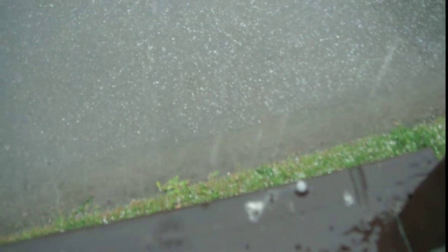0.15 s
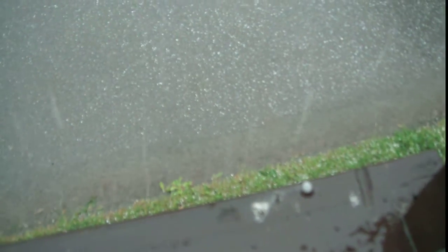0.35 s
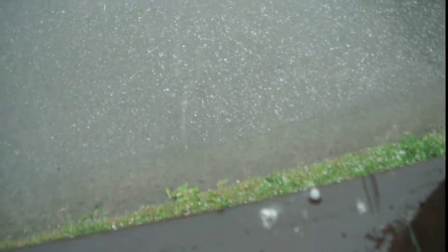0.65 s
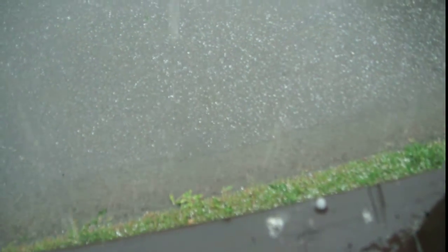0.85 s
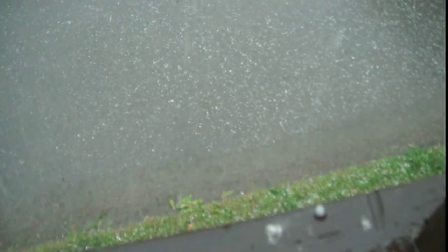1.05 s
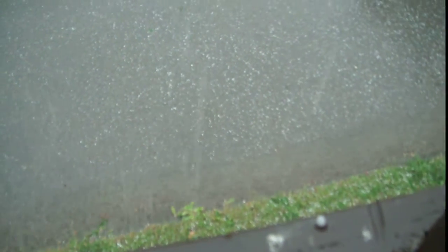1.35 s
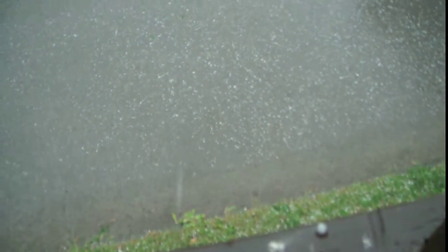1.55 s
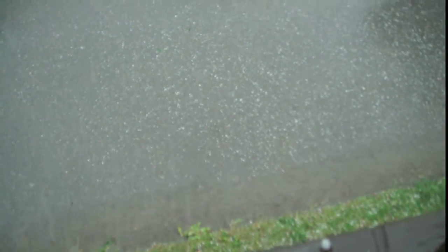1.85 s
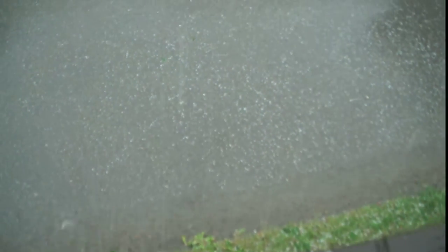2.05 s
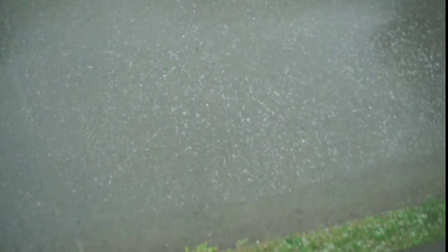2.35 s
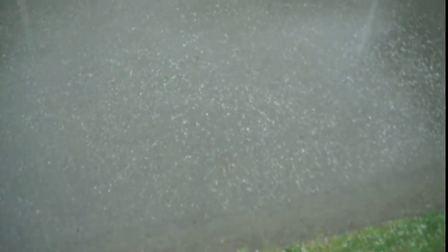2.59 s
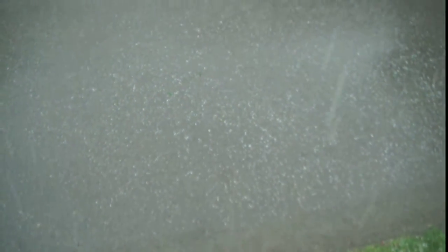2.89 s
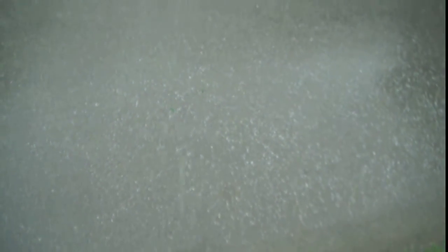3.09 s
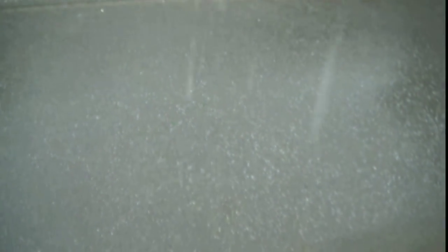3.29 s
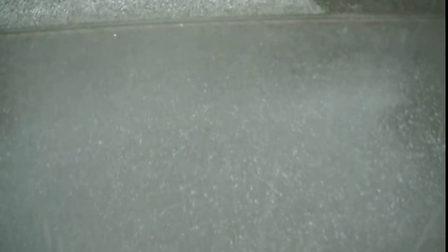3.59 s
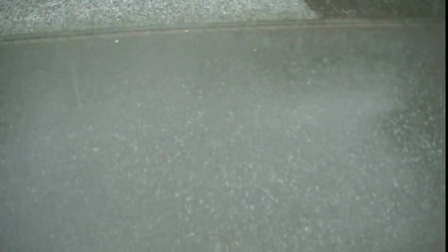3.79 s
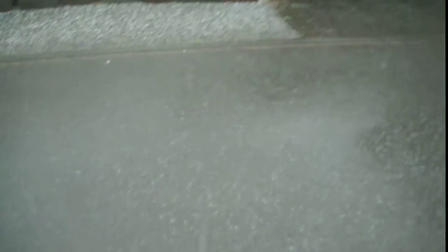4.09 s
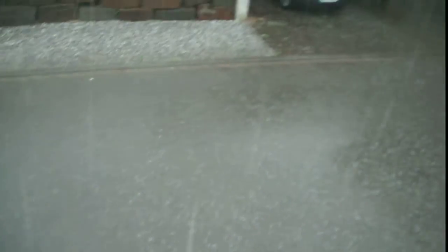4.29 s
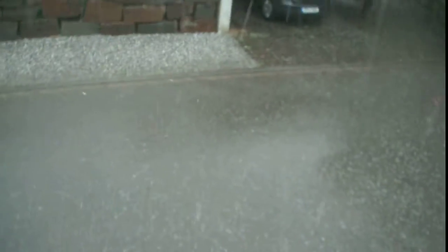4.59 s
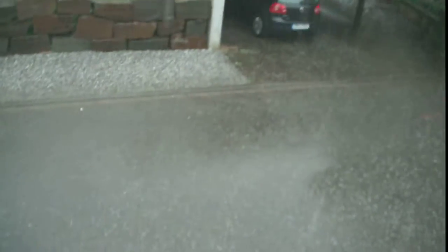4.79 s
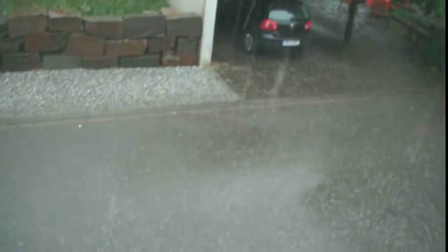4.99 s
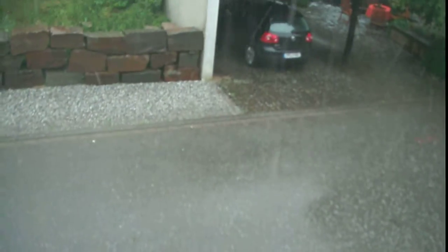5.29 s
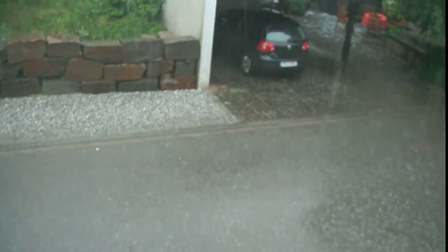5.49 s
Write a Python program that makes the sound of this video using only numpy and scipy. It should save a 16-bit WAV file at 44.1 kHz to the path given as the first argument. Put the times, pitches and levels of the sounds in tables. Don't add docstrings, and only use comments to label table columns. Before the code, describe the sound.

A steady, dense hiss of rain and hail on paving and gravel, heard from a sheltered doorway through a small camera's mono microphone. At first only a few hard clicks stand out; from about 2.7 seconds closer stones shatter and ping on metal or tile, the patter thickening. Low wind rumble and a pulsing motor hum sit beneath.

```python
import sys
import numpy as np
from scipy import signal
from scipy.fft import rfft, irfft
from scipy.io import wavfile

SR = 44100
rng = np.random.default_rng(int(sys.argv[2]) if len(sys.argv) > 2 else 0)


def to_linear_factor(level_db):
    exponent = np.asarray(level_db, float) / 20
    return 10 ** exponent


def materialize(psi):
    bounded = np.clip(np.atleast_2d(psi).T, -1, 1)
    quanta = np.round(bounded * 32767).astype(np.int16)
    wavfile.write(sys.argv[1], SR, quanta)


N = 249144


def rms_one(x):
    return x / np.sqrt(np.mean(x ** 2) + 1e-20)


def in_time(rows):
    s, *columns = np.transpose(rows)
    return [np.interp(np.arange(N) / SR, s, c) for c in columns]


def drift(rate_hz):
    r = np.exp(-2 * np.pi * rate_hz / SR)
    noise = rng.standard_normal(N + SR)
    return rms_one(signal.lfilter([1], [1, -2 * r, r * r], noise)[SR:])


def band(x, low_hz, high_hz, order=2):
    return signal.sosfilt(signal.butter(order, [low_hz, high_hz], "band", fs=SR, output="sos"), x)


def causal_response(spectrum, size=8192):
    hz, db = np.transpose(spectrum)
    grid_hz = np.maximum(np.arange(size // 2 + 1) * SR / size, 1)
    cepstrum = irfft(np.log(to_linear_factor(np.interp(np.log(grid_hz), np.log(hz), db))))
    cepstrum[1:size // 2] *= 2
    cepstrum[size // 2 + 1:] = 0
    response = irfft(np.exp(rfft(cepstrum)))
    return response / np.sqrt(np.sum(response ** 2))


def through(x, response):
    return signal.fftconvolve(x, response)[:N]


def drops(per_s, spread_db, splash_s):
    sizes = to_linear_factor(spread_db * np.minimum(rng.exponential(1, N), 3.5))
    struck = sizes * (rng.random(N) < per_s / SR)
    puffs = signal.lfilter([1], [1, -np.exp(-1 / (splash_s * SR))], struck ** 2)
    return rms_one(np.sqrt(puffs) * rng.standard_normal(N))


def rain():
    # start_s, hiss_db, extra_brightness_db, patter_above_hiss_db
    downpour = [
        (0.0, -34, -0.5, -13),
        (2.8, -35, 0.5, -7.5),
        (3.55, -34.5, 1, -2),
        (5.65, -35, 0.5, -4.5),
    ]
    hiss_db, bright_db, patter_db = in_time(downpour)
    far = rng.standard_normal(N) * to_linear_factor(0.55 * drift(6.6))
    near = to_linear_factor(-6.0) * drops(per_s=220, spread_db=6.5, splash_s=0.013)
    near += to_linear_factor(-4.5) * band(drops(per_s=47, spread_db=4.0, splash_s=0.002), 5400, 8600)
    near += to_linear_factor(-6) * band(drops(per_s=70, spread_db=1.5, splash_s=0.00046), 3560, 5300)
    near += to_linear_factor(-5) * band(drops(per_s=90, spread_db=10.5, splash_s=0.00044), 2100, 7500)
    near += to_linear_factor(-5.5) * band(drops(per_s=36, spread_db=3.0, splash_s=0.0026), 1380, 2730)
    near += to_linear_factor(-14) * band(drops(per_s=40, spread_db=3.5, splash_s=0.008), 950, 1300)
    fall = far + to_linear_factor(patter_db) * near
    fall = fall + (to_linear_factor(bright_db) - 1) * band(fall, 7800, 21000)
    return to_linear_factor(hiss_db) * fall


def plinks():
    per_s, ring_cycles, level_db = 60, 32, -51
    sizes = to_linear_factor(4.3 * np.minimum(rng.exponential(1, N), 3))
    struck = sizes * (rng.random(N) < per_s / SR)
    out, chip = 0, rng.integers(0, 12, N)
    for k, hz in enumerate(np.geomspace(1900, 5000, num=12)):
        r, w = to_linear_factor(-60 * hz / ring_cycles / SR), 2 * np.pi * hz / SR
        resonator = [1, -2 * r * np.cos(w), r * r]
        out = out + signal.lfilter([0, np.sin(w)], resonator, struck * (chip == k) + 1e-18)
    return to_linear_factor(level_db) * rms_one(out)


def wind():
    # start_s, gust_db
    gusts = [(0, -38.5), (.1, -45), (.7, -45.5), (1.0, -44), (1.65, -46), (1.95, -42.5), (2.65, -45),
             (3.4, -42), (3.85, -41.5), (4.3, -40.5), (4.5, -42), (4.75, -40), (5.1, -41.5), (5.17, -35),
             (5.25, -38.5), (5.45, -43.5), (5.65, -41.5)]
    # pitch_hz, level_db per Hz
    wind_colour = [(41, -61.5), (70, -1), (129, 0), (199, -6.5), (387, -12.5), (454, -15), (900, -34.5),
                   (1170, -19), (1980, -120)]
    rumble_mean_db, rumble_follows, rumble_lumps_db = -42, 1, 3
    gust_db, = in_time(gusts)
    rumble = rms_one(band(rng.standard_normal(N + SR), 15.6, 36)[SR:])
    rumble_db = rumble_mean_db + rumble_follows * (gust_db - gust_db.mean()) + rumble_lumps_db * drift(7.7)
    flutter = rms_one(through(rng.standard_normal(N), causal_response(wind_colour)))
    return to_linear_factor(rumble_db) * rumble + to_linear_factor(gust_db + 0.5 * drift(39)) * flutter


def jolt(since, level_db):
    return to_linear_factor(level_db) * np.sin(np.pi * np.clip(since / 0.027, 0, 1)) ** 2


def motor():
    # start_s, length_s, level_db, pitch_hz, sag_hz_per_s
    runs = [
        (-.232, 0.55, -35.5, 58.8, 7.1),
        (0.77, 0.57, -35.5, 55.5, .5),
        (1.766, .55, -36.5, 58.6, 0.51),
        (2.769, 0.63, -36, 58.5, 3),
        (3.79, .52, -34.5, 58.6, 12),
        (4.769, .62, -35, 56.8, 5),
    ]
    spin_up_s, spin_down_s, idle_db = 0.012, 0.016, -49
    start_jolt_db, stop_jolt_db = -28, -33.5
    t, waver = np.arange(N) / SR, 1 + 0.039 * drift(12.2)
    bearings = rms_one(band(rng.standard_normal(N + SR), 34, 84)[SR:])
    out = to_linear_factor(idle_db) * bearings
    for start, length, level_db, hz, sag in runs:
        since = t - start
        running = np.clip(np.minimum(since / spin_up_s, (length - since) / spin_down_s), 0, 1)
        phase = 2 * np.pi * np.cumsum((hz - sag * since) * waver) / SR
        out = out + to_linear_factor(level_db) * running * (1.16 * np.sin(phase) + to_linear_factor(-13.5) * bearings)
        out = out + jolt(since, start_jolt_db) - jolt(since - length, stop_jolt_db)
    return out


def electronics():
    # pitch_hz, level_db rms
    whistle = [
        (7865, -67),
        (15735, -84),
    ]
    t = np.arange(N) / SR
    whistles = sum(np.sqrt(2) * to_linear_factor(db) * np.sin(2 * np.pi * hz * t) for hz, db in whistle)
    hiss = rms_one(band(rng.standard_normal(N), 9000, 19000))
    return whistles + to_linear_factor(-64 + 3.5) * hiss


def stone_rows():
    # start_s, peak_db, hardness, focus_db
    paving = [(.0842, -24, 0.99, 18), (1.5673, -25, 1.2, 14), (2.0582, -23.5, .9, 14),
              (2.376, -30, 1.4, 13), (2.809, -29.5, 0.98, 7), (2.9444, -32, 1.8, 4),
              (3.382, -33.5, 1.5, 13), (3.4266, -26, 1.4, 3), (3.737, -28, .2, 7), (3.7754, -29, 0.86, 8),
              (4.2803, -27, 1.4, 6), (4.2986, -30, 1.3, 1), (4.356, -26, 1.05, 17), (4.583, -34, .9, 3),
              (4.9272, -31.5, 1.2, 9), (4.969, -24.5, 1.25, 16), (5.1326, -23, 1.35, 18),
              (5.3827, -29, 0.4, 9)]
    # start_s, peak_db, hardness, focus_db
    gravel = [(.717, -32, 1.2, 18), (.7494, -31, 2.05, 9), (.9394, -27.5, 2.1, 10), (2.1994, -27, 1.6, 13),
              (2.7025, -32, 2.4, 10), (2.8424, -30, 3.2, 1), (2.9724, -32, 2.4, 4), (3.0864, -30, 2.34, 11),
              (3.524, -29, 2.33, 12), (3.663, -29, 1.6, 8), (3.815, -34, 1.65, 14), (3.9234, -26, 1.95, 14),
              (4.443, -29, 2.4, 7), (4.466, -29, 2.2, 10), (4.5184, -29, 2.3, 7), (4.5404, -27.5, 2.24, 8),
              (4.558, -30, 1.65, 14), (4.7835, -25, 1.95, 10), (5.2628, -28.5, 1.2, 2)]
    # start_s, peak_db, hardness, focus_db
    snaps = [(.7138, -15, 1.56, 32), (2.059, -35, 1.5, 15), (2.2, -29, 1.3, 23), (3.0535, -18.5, 2.2, 20),
             (3.400, -26, 1.7, 13), (3.523, -32, 3.2, 8), (3.7675, -13, 1.5, 30), (3.8525, -23.5, 1.1, 4),
             (4.2975, -34, 2.5, 10), (4.4865, -19, 2, 17), (5.6153, -14.5, 3.4, 2)]
    # start_s, peak_db, hardness, focus_db, burst_s
    shatters = [(2.7287, -26, 0.77, 7, .0077), (3.3165, -30, 0.91, 20, 0.0082),
                (3.4531, -24.5, 1.1, 11, 0.013), (3.5618, -32, .6, 4, 0.006),
                (3.6124, -15, 1.57, 3.5, 0.0074), (3.7673, -17, 0.71, 9.5, .008),
                (4.0407, -29, 0.7, 5, 0.013), (4.2393, -27, 0.6, 8, .0084), (4.6566, -28, 0.97, 2, 0.0084),
                (4.6653, -23, 1.45, 6, .0074), (4.671, -24, 0.84, 6, .0094), (4.685, -33, 0.55, 7, .0098),
                (5.6151, -18.5, 1.33, 6, 0.011)]
    kinds = [(paving, 0.0038), (gravel, 0.0051), (snaps, 0.002)]
    small = [(*row, burst_s) for rows, burst_s in kinds for row in rows]
    return np.transpose(small + list(shatters))[:, :, None]


def hailstones(port):
    edges_hz = [800, 1650, 3200, 5500, 11000]
    lingers = (1.11, 1.34, 0.81, 1.3)
    focus_share = (2.6, 0.88, 0.93, 1.26)
    s, peak_db, hardness, focus_db, burst_s = stone_rows()
    t = np.arange(2048) / SR
    noise, stones = rng.standard_normal((len(s), len(t))), 0
    away = np.abs(np.arange(len(lingers))[:, None, None] - hardness)
    away = away - away.min(axis=0)
    levels_db = peak_db - np.abs(focus_db) * away * np.reshape(focus_share, (-1, 1, 1))
    for low, high, level_db, linger in zip(edges_hz, edges_hz[1:], levels_db, lingers):
        shape = np.exp(-(t / (burst_s * linger)) ** 2) + to_linear_factor(-35.0) * np.exp(-t / 0.015)
        energy = np.sum(shape ** 2, axis=1)
        bursts = shape * noise
        bursts[:, 0] += 0.4 * np.sqrt(energy)
        part = signal.fftconvolve(band(bursts, low, high, order=3), port[None, :1024])[:, :len(t)]
        even = np.sqrt(energy / np.sum(part ** 2, axis=1))
        stones = -stones + to_linear_factor(level_db - 5.0) * even[:, None] * part
    out = np.zeros(N + len(t))
    for start, stone in zip(s[:, 0], stones):
        out[round(start * SR):][:len(t)] += stone
    return out[:N]


def rings():
    # start_s, peak_db, pitch_hz, t60_s
    struck_notes = [(2.7282, -24, 2360, 0.03), (3.3176, -9, 2150, 0.035), (3.3158, -11, 2470, 0.03),
                    (3.3802, -18, 2200, 0.03), (3.5618, -13.5, 2190, 0.048), (3.7673, -31, 2170, 0.03),
                    (5.6151, -18, 1940, 0.041), (2.7277, -12.5, 3140, 0.03), (3.6132, -7, 2910, 0.038),
                    (3.7668, -14, 2950, 0.027), (5.6166, -20, 3000, 0.021), (2.7302, -21.5, 1160, 0.05),
                    (3.5259, -20, 1080, 0.032), (3.5713, -25.5, 1120, 0.3), (4.7321, -26, 1060, 0.074),
                    (5.2644, -33, 1200, 0.05), (5.3844, -37, 1100, 0.056), (3.4526, -24, 1570, 0.028),
                    (3.8524, -4, 1640, 0.0095), (2.6948, -13, 5100, 0.0087), (3.4256, -29, 5960, 0.028),
                    (3.6127, -15, 5400, 0.011), (4.2971, -12, 5100, 0.011), (5.6146, -17, 5140, 0.01)]
    out, t = np.zeros(N + 4096), np.arange(4096) / SR
    for s, level_db, hz, t60 in struck_notes:
        decay = to_linear_factor(level_db - 6.5 - 60 * t / t60)
        onset = np.minimum(t / 0.001, 1)
        out[round(s * SR):][:len(t)] += decay * np.sin(2 * np.pi * hz * t) * onset
    return out[:N]


def slips():
    # end_s, level_db, start_hz, end_hz, length_s
    hand_slips = [
        (3.857, -28, 120, 240, 0.01095),
        (5.162, -26.5, 59.4, 135.6, 0.07),
        (5.387, -31.5, 106.2, 190.8, .085),
    ]
    release_db, release_s = -5.5, 0.012
    out, t = 0, np.arange(N) / SR
    rough = rms_one(band(rng.standard_normal(N), 120, 378))
    for end, level_db, start_hz, end_hz, length in hand_slips:
        along = np.clip((t - end) / length + 1, 0, 4 / 3)
        phase = 2 * np.pi * length * (start_hz * along + (end_hz - start_hz) * along ** 2 / 2)
        swell = np.sin(np.pi * (along * 3 / 4) ** 1.8)
        push = swell * (np.sin(phase) + 0.2 * np.sin(2 * phase))
        thud = to_linear_factor(release_db) * np.exp(-((t - end) / min(release_s, length / 3)) ** 2) * rough
        out = out + to_linear_factor(level_db) * (push + thud)
    return out


def scene():
    # pitch_hz, level_db per Hz
    microphone = [(290, -48), (500, -16.5), (874, -13.5), (1140, -4.5), (1530, -12), (1840, -2),
                  (2250, 2.5), (3010, -3.5), (3440, -3), (4250, -5), (5120, -11), (6600, -25.5),
                  (8050, -15.5), (9200, -13.5), (12000, -29.5), (15600, -49), (22000, -120)]
    port = causal_response(microphone)
    street = through(rain(), port) + hailstones(port) + rings()
    handling = slips()
    camera = wind() + motor() + electronics()
    mono = street + handling + camera + plinks()
    return np.array([mono, mono])


def low_pass(x):
    return signal.sosfilt(signal.butter(12, 16510, fs=SR, output="sos"), x)


def record(dry):
    headroom, cutoff_hz = 0.6, 15790
    spectrum = rfft(headroom * np.tanh(dry / headroom))
    spectrum[:, int(cutoff_hz * N / SR):] = 0
    return low_pass(irfft(spectrum, N))


dry = scene()
out = record(dry)
materialize(out)
```